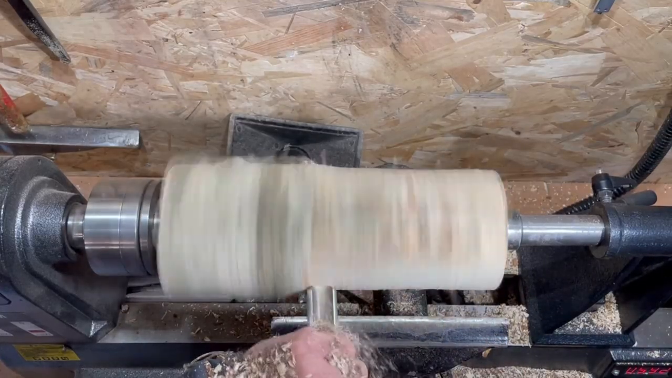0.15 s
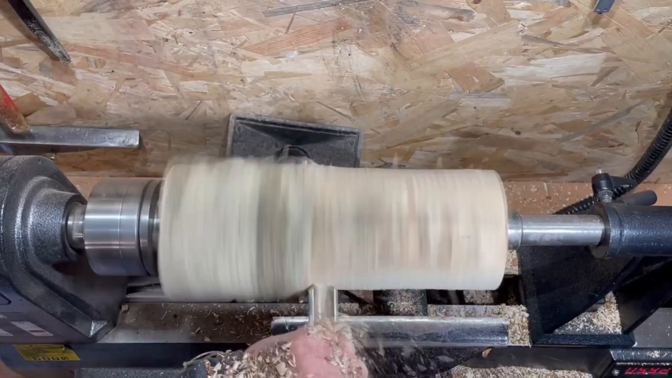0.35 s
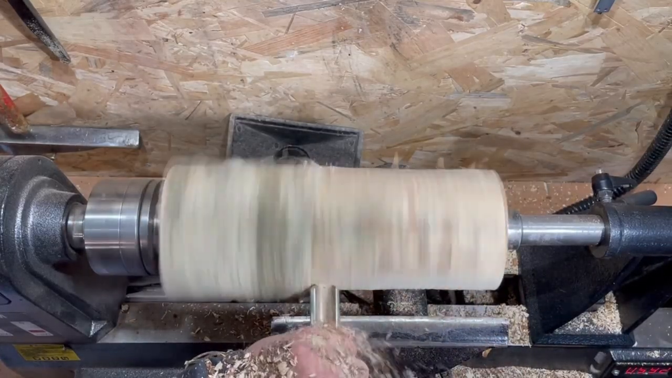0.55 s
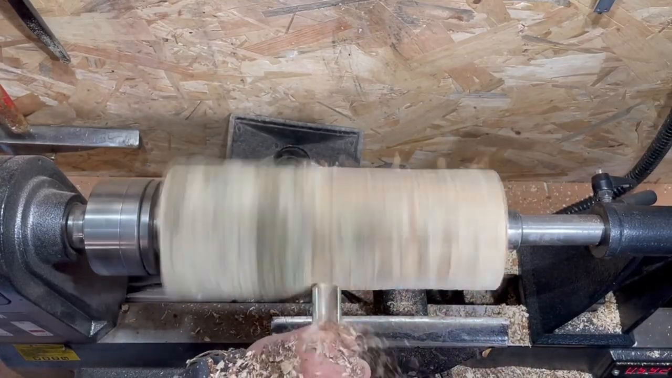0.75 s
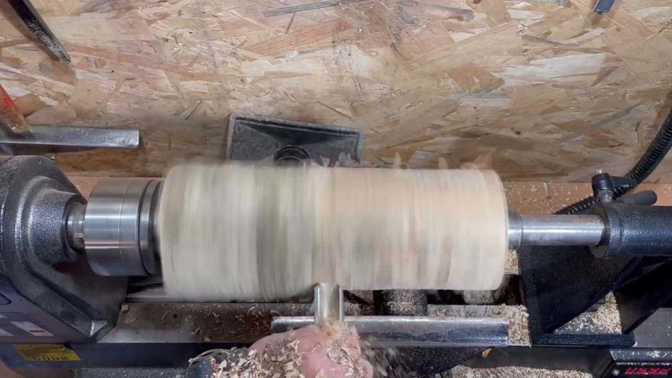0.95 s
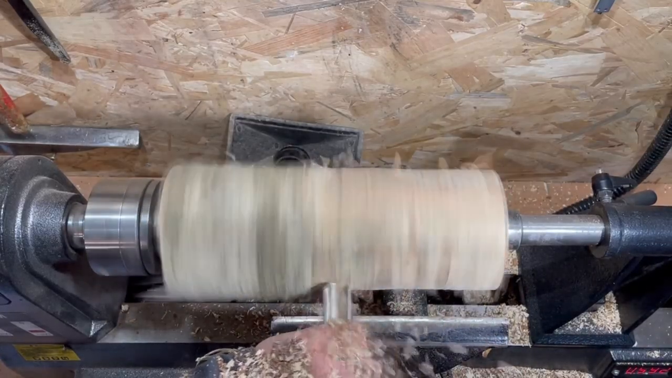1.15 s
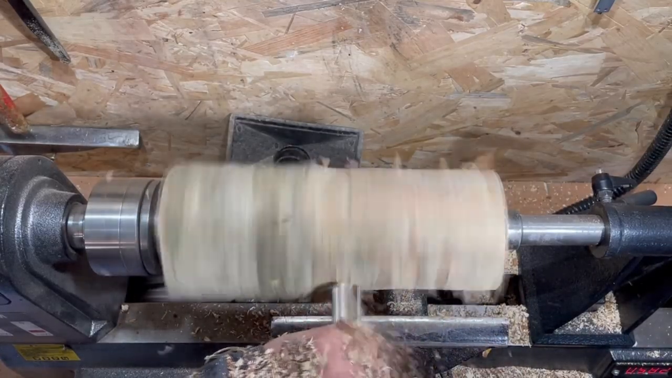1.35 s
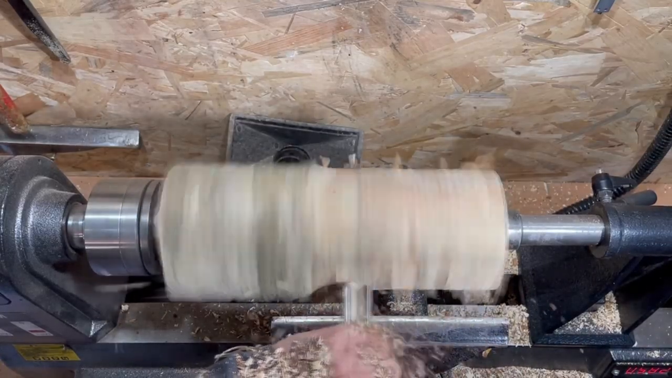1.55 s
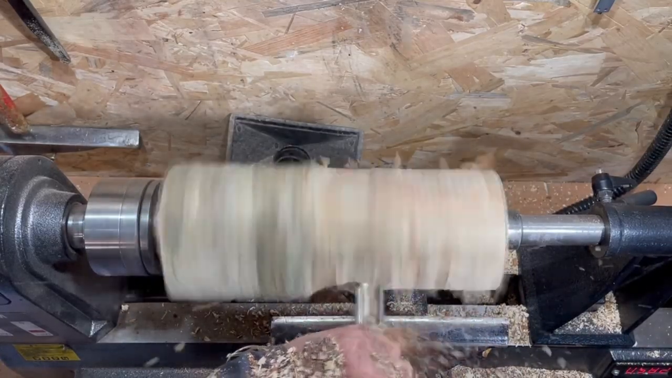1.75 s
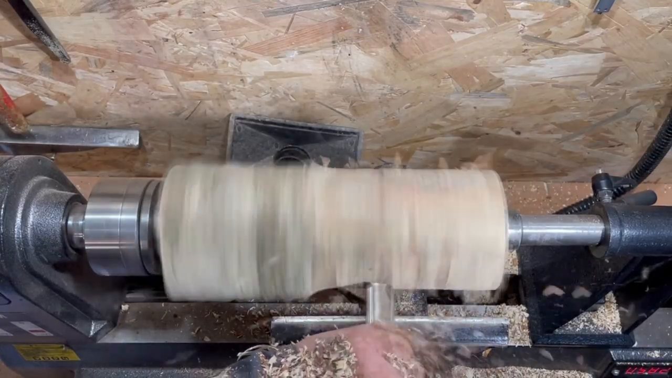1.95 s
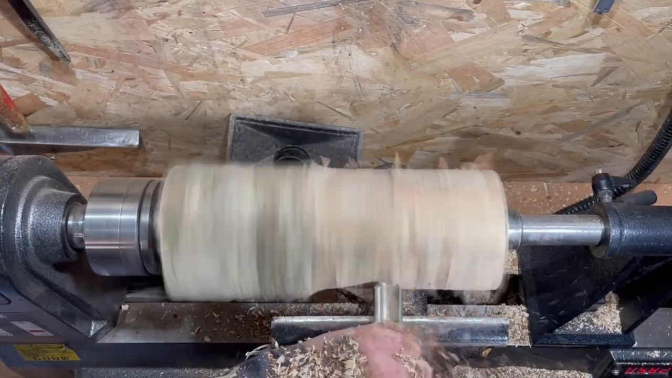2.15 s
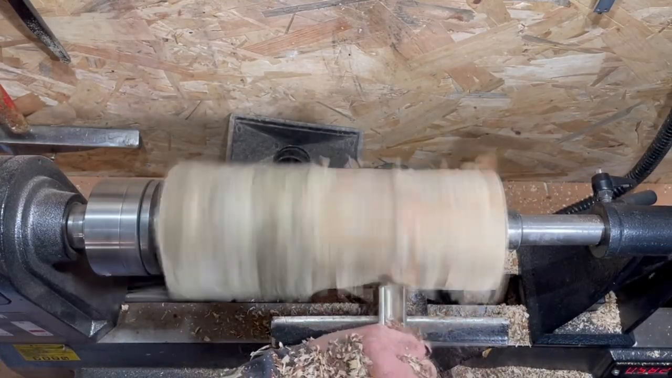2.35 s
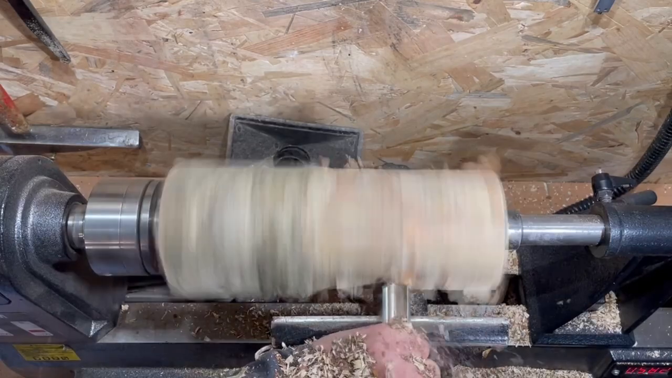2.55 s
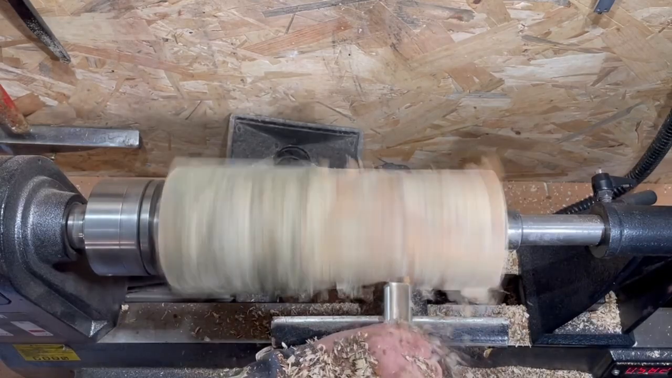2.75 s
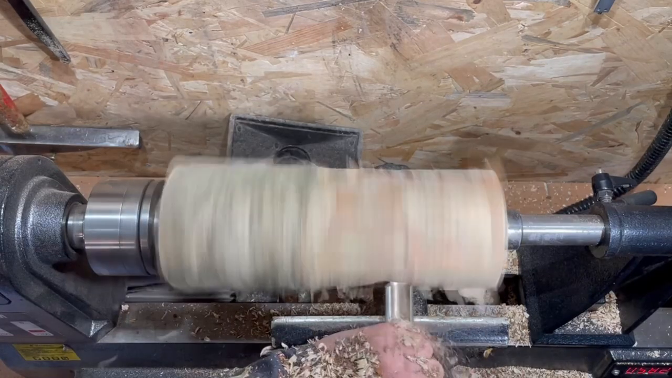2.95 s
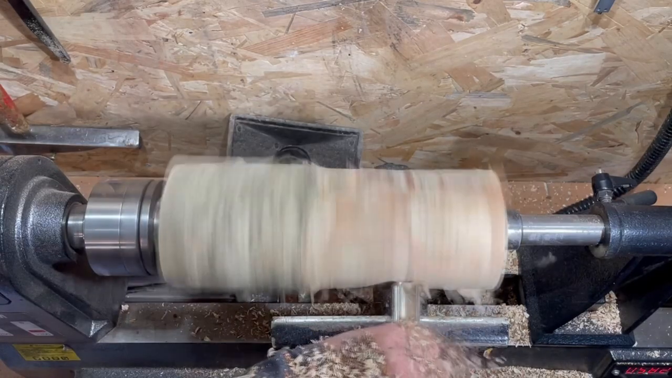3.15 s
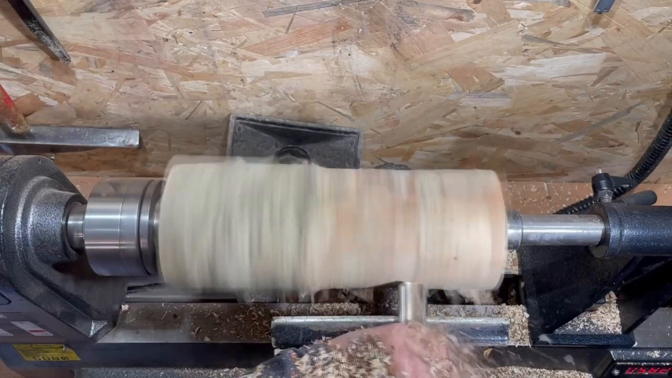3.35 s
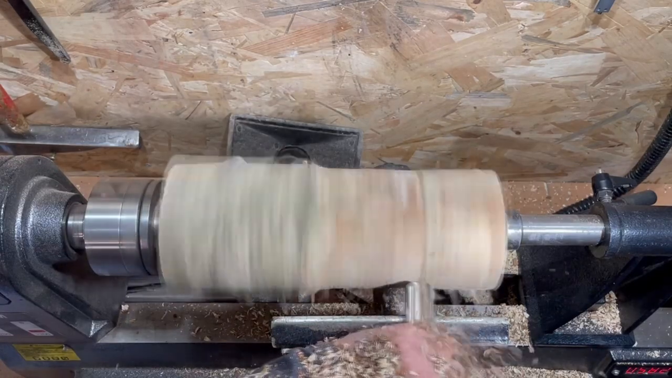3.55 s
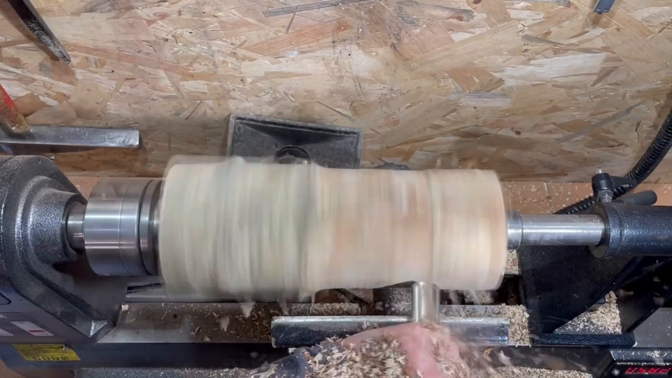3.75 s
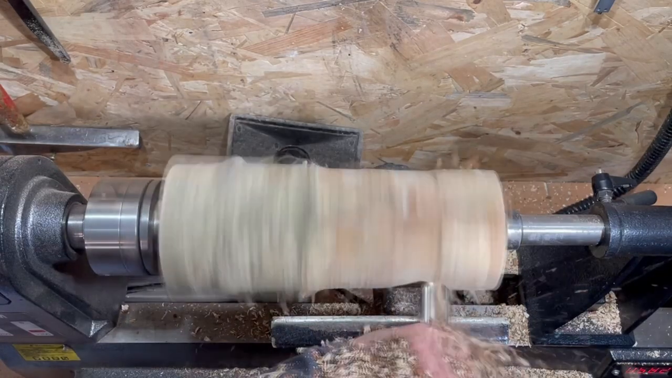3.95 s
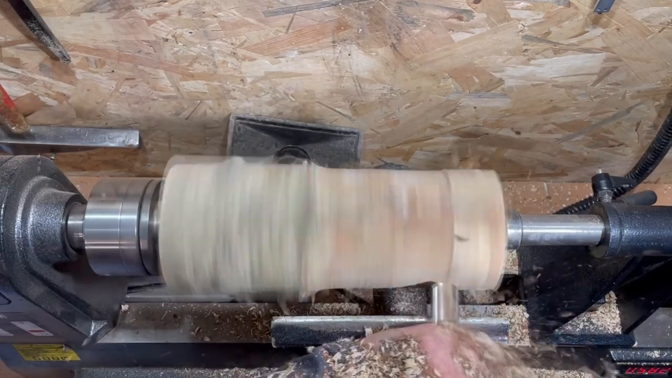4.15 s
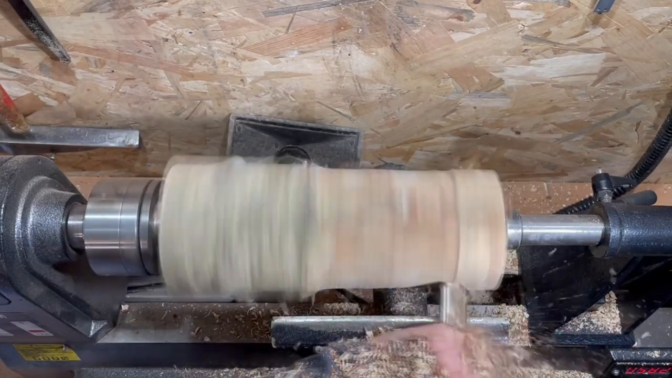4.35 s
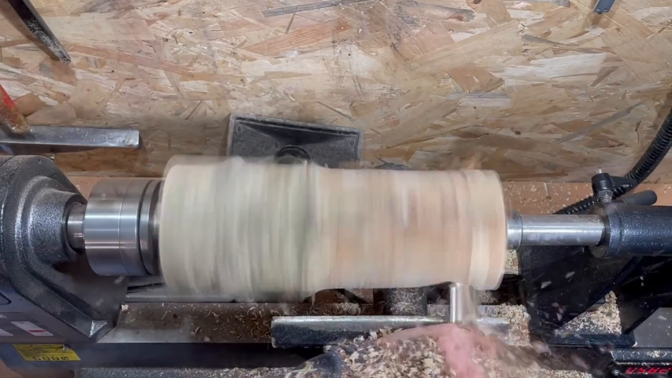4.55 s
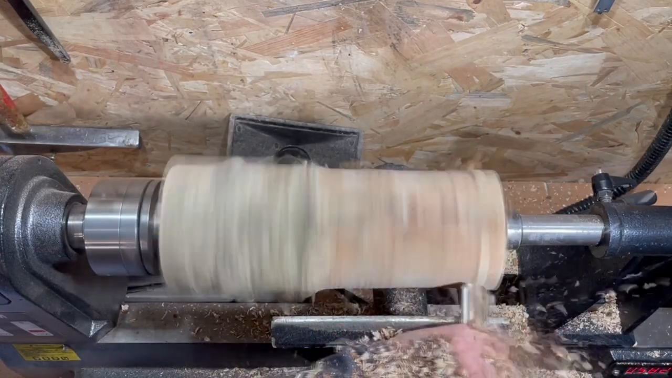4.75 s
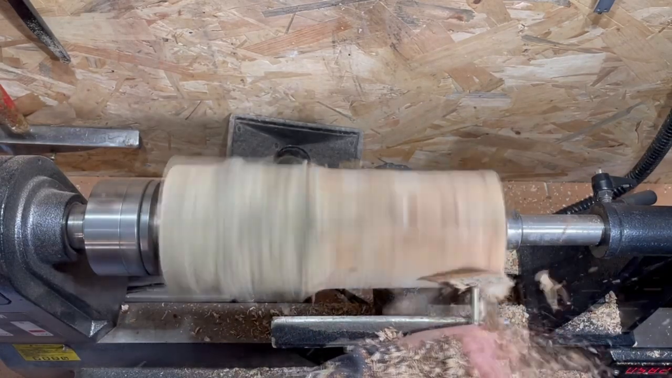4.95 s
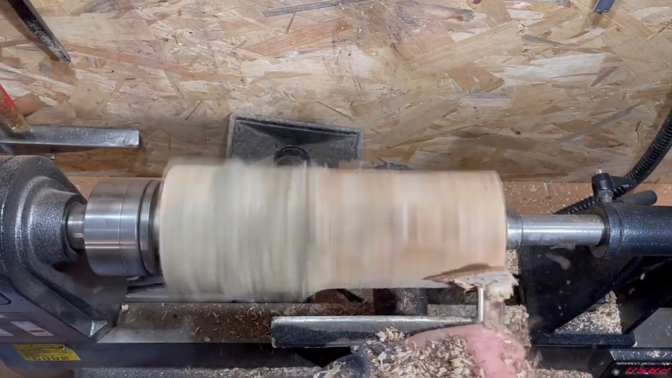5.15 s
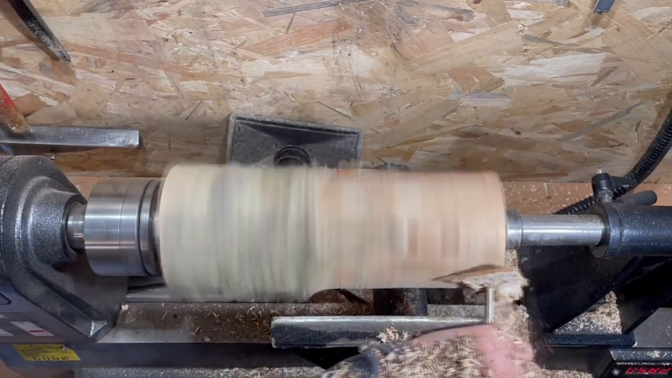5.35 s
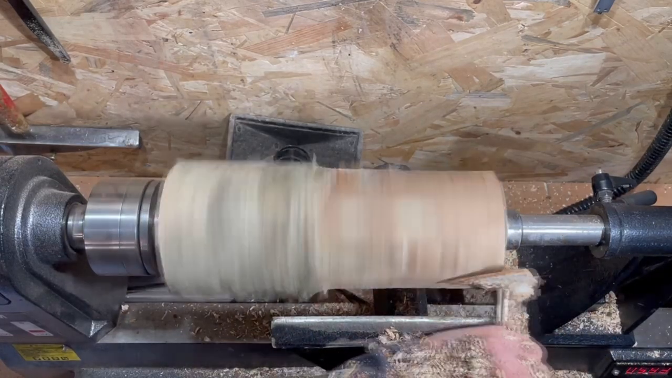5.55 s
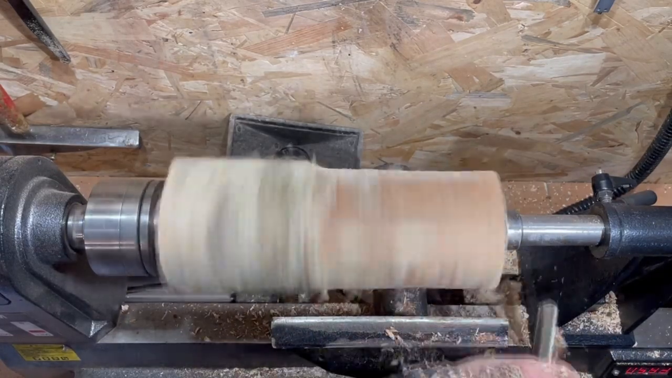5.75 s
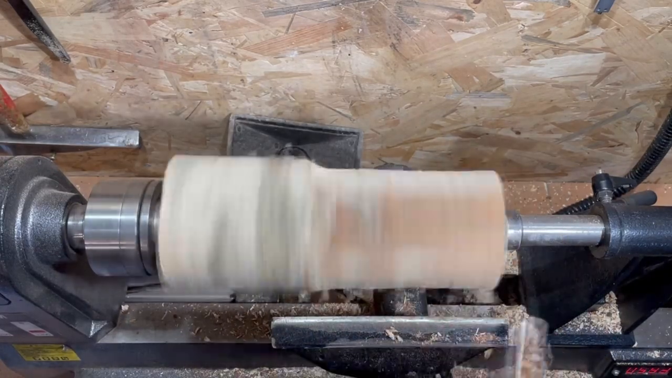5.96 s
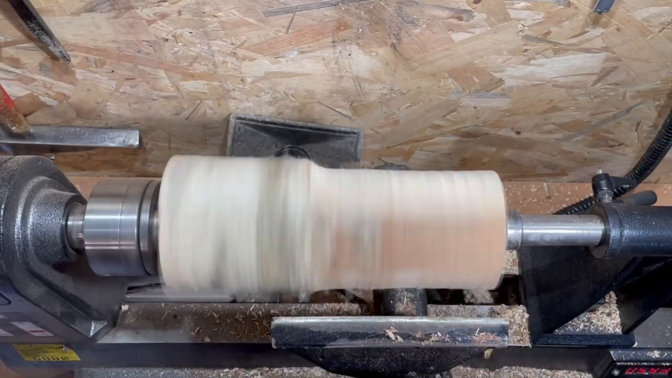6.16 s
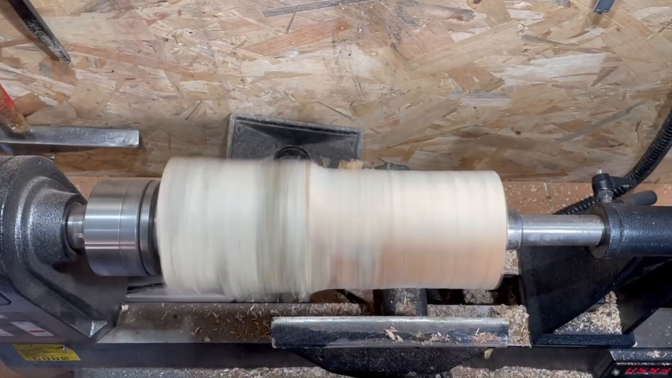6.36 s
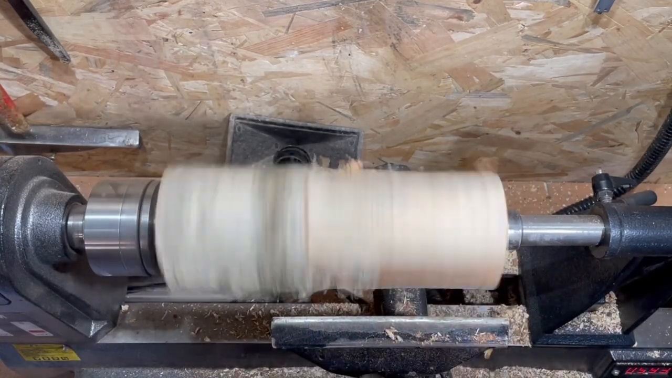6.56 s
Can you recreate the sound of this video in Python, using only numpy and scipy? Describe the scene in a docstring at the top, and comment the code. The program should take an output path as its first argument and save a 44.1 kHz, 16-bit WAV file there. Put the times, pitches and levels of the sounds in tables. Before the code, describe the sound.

Close to a wood lathe in a small workshop, a steel gouge tears into an uneven spinning log with a loud, rough, rapidly pulsing scrape. Shavings hiss, ridges knock against the edge, splinters squeak and the tool rest buzzes at one low pitch. The cut skips briefly, bites harder, then fades as the gouge lifts off. A few chips tick down over the quiet motor hum, fan and thin high whine.

```python
"""A workshop, close to the lathe: a steel gouge roughs an uneven log spinning about ten times a second.
Flats and ridges break the tearing of the fibres in the same rhythm every turn; log, tool, rest and bed
ring with it. Shavings hiss, ridges knock, splinters squeak and the rest chatters at one pitch.
When the gouge leaves the wood, the motor's fan and hum, the whine of its drive and a few falling
chips remain."""
import sys
import numpy as np
from scipy import signal
from scipy.fft import rfft, irfft, next_fast_len
from scipy.io import wavfile
from scipy.ndimage import uniform_filter1d

SR = 44100
rng = np.random.default_rng(int(sys.argv[2]) if len(sys.argv) > 2 else 0)


def to_wav(sig):
    """Store sig (one row per channel, or 1-D mono) as 16-bit WAV at the path in sys.argv[1].

    Samples outside -1..1 are clipped; the rate is SR.
    """
    pcm = np.clip(np.atleast_2d(sig), -1, 1) * 32767
    pcm = np.round(pcm).astype(np.int16)
    wavfile.write(sys.argv[1], SR, pcm.T)  # frames by channels


N = 291501
SIZE = next_fast_len(N + SR)
HZ, TIME = np.fft.rfftfreq(SIZE, 1 / SR), np.arange(N) / SR
TURN_MS, CHATTER_HZ = 99.2, 270.5
CARRIER_HZ, FIELD_HZ = 9910.7, 29.65  # the motor's drive
HISS_SHARE, BLADE_SHARE = 0.4, 0.79  # how far hiss and blade follow a skip or a grab

# Faders of the cut, trimmed per layer: t/s, tearing/dB, blade over tearing/dB, rest boom/dB, chatter/dB
CUT_FADERS = [(0.05, -35.5, 4.5, -33.5, -39), (0.5, -35.5, 7.5, -35.5, -34.5),
              (0.9, -38.5, 6.5, -35.5, -37.5), (1.1, -29, 2, -33, -40), (1.5, -27, 0, -33, -35.5),
              (1.75, -25.5, -1.5, -26.5, -31), (2.1, -29, -1, -33.5, -28.5), (2.3, -32.5, -1.5, -36, -47),
              (2.42, -31.5, -3, -37.5, -31.5), (2.65, -32, 0, -35.5, -35), (2.9, -36, 0.5, -43.5, -37.5),
              (3.12, -27.5, -4, -34.5, -37.5), (3.7, -31.5, 1, -37, -28.5), (3.95, -25, -2, -30, -25.5),
              (4.17, -29, -2, -32, -30), (4.37, -24.5, -2.5, -29, -28), (4.55, -28.5, -1, -33.5, -27.5),
              (4.8, -25, -4, -29.5, -32), (5.05, -32.5, 2.5, -32, -36), (5.35, -34, 0, -38, -33.5),
              (5.5, -43.5, 0, -49, -55), (5.62, -51, -4, -61, -71), (5.67, -61, -7, -64, -65)]
# The machine answers as the gouge travels along the rest: t/s, shank ring/dB, bed shake/dB
MACHINE_FADERS = [(0.05, -32.5, -47.5), (0.55, -36, -44), (0.9, -38.5, -52), (1.15, -27.5, -60),
                  (1.55, -35.5, -60), (1.8, -40, -48.5), (2.1, -48, -48), (2.3, -61, -53.5),
                  (3.2, -54, -54.5), (3.7, -47, -53), (4.0, -32, -54), (4.4, -37, -53), (4.7, -34, -60),
                  (4.88, -32, -44), (5.1, -44, -63), (5.35, -41, -54.5), (5.6, -72, -68)]
# The hiss of the shavings swells and thins with the grain: t/s, gain/dB
HISS_FADER = [(0.05, 5), (0.6, 6), (1.1, 1.5), (1.9, 1), (2.3, 2), (2.6, 1), (3.6, 2), (4.2, 3), (4.6, 4),
              (5.2, 5), (5.6, 5)]
# The rest is loaded and eased once a turn: t/s, swing/dB
REST_ROCKING = [(0.1, 6), (2.0, 0.5), (3.6, 4), (5.3, 1)]
# The spindle drags under a heavy cut, then catches up: t/s, main ridge's delay into the turn/ms
SPINDLE_LAG = [(0.05, 56), (0.5, 52), (1.05, 49.5), (1.35, 50), (1.64, 52.5), (2.24, 56.4), (2.63, 52.7),
               (3.22, 49.2), (3.55, 48.4), (3.92, 49.2), (4.42, 53.6), (4.9, 57), (5.6, 59)]
# Three flats on the log: end after the main ridge/ms, base length/ms, lip bite over depth/ratio
LOG_FLATS = [(99.4, 10.2, 0.55), (38.5, 13, 0.5), (62.5, 13.5, 0.15)]
# Depth of the flats along the log: t/s, first/dB, second/dB, third/dB, first comes early by/ms
FLAT_DEPTHS = [(0.1, 11, 13, 15, 0.5), (0.5, 6.5, 9, 8, -0.5), (0.9, 6, 5, 2, 0), (2.0, 6.5, 3, -2, 1),
               (2.5, 6.5, 5, 0, 0), (3.3, 7, 5, 1, 0), (4.1, 8, 0, 0.5, 0), (4.7, 5.5, 4, 0, 1),
               (5.3, 6.5, 5, -0.5, 5.5), (5.6, 6, 0.5, 3, 15.5)]
# Narrow ridges of hard grain: t/s, first at/ms, first/dB, second at/ms, second/dB, third/dB
GRAIN_RIDGES = [(0.1, 22, 5.5, 49, -1, 8), (0.8, 23.5, 6.5, 37.5, 7, 0), (1.3, 21, 0, 49.6, 6, 6.5),
                (2.0, 25, 4, 59, 2, 5), (3.0, 31.6, 2.5, 51, 5.5, 2), (4.2, 31.5, 4, 50, 2, 3),
                (4.7, 25, -1, 56, 0, 2), (5.2, 36, -1, 52, 3.5, 1)]

# The edge strikes a ridge: t/s, level/dB, crack over knock/dB
RIDGE_HITS = [(0.2526, -23, 4), (0.4324, -22, -17), (0.9836, -25, -4), (1.5389, -16, -10),
              (1.6402, -9.5, -3.5), (2.14, -15.5, -16), (2.176, -20, 1.5), (2.2392, -17.5, -26),
              (2.6326, -12, -25), (2.7315, -13, -26), (2.8295, -14.5, -21), (2.9277, -14, -30),
              (3.0253, -15.5, -29), (3.1254, -14.5, -17), (3.2247, -15, -23), (3.323, -13, -11),
              (3.4216, -13.5, -16), (3.5204, -12, -16), (3.7202, -15.5, -4), (3.8182, -16, -20),
              (3.918, -12, -5), (4.018, -17.5, 0.5), (4.1195, -14, -21), (4.2178, -13.5, -22),
              (4.3184, -11.5, -14), (4.4183, -9.5, -11), (4.7028, -14, -8), (4.8035, -13.5, -7),
              (4.905, -11, -4), (4.918, -16, -10)]
# The edge skips clear of the wood: t/s, length/s, depth/dB
EDGE_SKIPS = [(2.175, 0.073, 12), (2.246, 0.083, 13), (2.45, 0.072, 5), (2.545, 0.08, 12.5)]
# The edge grabs a thick shaving: t/s, boost/dB, decay/s, extra hiss/dB
EDGE_GRABS = [(0.981, 0, 0.017, 14), (1.74, 6, 0.021, 0), (1.795, 11, 0.007, -7), (2.377, 16, 0.019, 5),
              (2.54, -5, 0.051, 13.5), (2.672, 7, 0.03, 4), (4.66, 8, 0.029, -1), (1.638, 8, 0.011, 2),
              (2.633, 2.5, 0.025, -3), (5.42, 9, 0.0074, 2)]
# Big splinters break off: t/s, f/Hz, level/dB
SPLINTER_BREAKS = [(2.383, 1900, -15), (2.647, 2900, -19), (2.683, 2050, -19), (5.0275, 3480, -24),
                   (5.066, 3470, -26), (5.172, 2010, -27), (5.2674, 3460, -28), (5.272, 5150, -33),
                   (5.3702, 2790, -31), (5.4246, 2770, -30), (5.5169, 2720, -39)]
# Loose chips tick on the bed: t/s, level/dB
CHIP_TICKS = [(5.549, -35), (5.5822, -37), (5.6012, -26), (5.6296, -31.5), (5.8032, -38), (6.0492, -40),
              (6.3894, -43)]

# Resonances of log, blade, cutting tip, shank, tool rest and log end: f/Hz, width/Hz, level/dB
WOOD_MODES = [(1657, 10.7, 2.5), (1979, 160, 2.5), (2276, 52, -1.5)]
BLADE_MODES = [(3420, 55, 8), (3975, 60, -5), (2740, 70, -3), (3200, 100, 0.5), (2540, 40, -2)]
TIP_MODES = [(5146, 380, 0)]
SHANK_MODES = [(1325, 120, 0)]
REST_MODES = [(243.4, 16, 0), (295.7, 20, -1), (357, 12, 3), (437, 14, 2), (500, 30, 0), (542, 16, 1)]
LOG_END_MODES = [(770, 250, 0), (956, 240, 0)]
# Broad colour of log, blade, rest, shavings, and motor fan with bearings: f/Hz, gain/dB
WOOD_EQ = [(500, -55), (700, -10), (1100, -5), (1800, -10), (2500, -14.5), (3200, -31)]
BLADE_EQ = [(1900, -56), (2500, -2), (3400, 4.5), (3750, -6), (4400, -4.5), (5300, -7.5), (5600, -34),
            (6500, -18)]
REST_EQ = [(90, -29), (150, -20), (200, -8), (400, -3), (580, -17), (800, -26)]
HISS_EQ = [(4000, -72), (5800, -3), (7000, 0.5), (9000, -3), (11000, 3), (14000, 0), (16000, -3)]
FAN_EQ = [(25, -10), (90, -9), (600, -5), (840, -8), (950, -18.5), (1500, -12.5), (6000, -32), (8800, -35),
          (10000, -12), (11000, -22), (11800, -33), (14000, -33)]
# Hum of the motor housing: f/Hz, width/Hz, level/dB
HOUSING_HUM = [(88, 20, -64), (237, 20, -62), (270, 12, -58), (357, 10, -59), (497, 8, -54), (542, 12, -56),
               (630, 8, -55.5), (830, 50, -65), (2700, 120, -73), (3800, 90, -74)]
# Side tones of the drive: offset from the carrier/steps of FIELD_HZ, level/dB
DRIVE_TONES = [(-14, -61), (-8, -58), (-6, -60), (-3, -61), (-2, -53), (2, -51), (3, -62), (4, -57),
               (6, -62)]

# Likeness of left and right: f/Hz, coherence/ratio
STEREO_LIKENESS = [(60, .98), (280, .98), (560, .5), (1400, .8), (4000, .72), (6000, .6), (8500, .86),
                   (13000, .97)]
# Phase between the sides: f/Hz, left lead/rad
STEREO_PHASE = [(60, 0), (2100, .15), (3300, .9), (5500, .1), (5900, -.8), (6900, -1.1), (7700, -3),
                (9500, -3.3), (11000, -4.6), (12400, -6.1), (13100, -6.28)]
# Balance: f/Hz, left over right/dB
STEREO_BALANCE = [(60, .5), (300, 2.8), (700, 1.6), (4500, 1.7), (8000, 0)]
LIFT_S = CUT_FADERS[-1][0]  # the gouge leaves the wood


def gouge():
    """Tearing fibres drive the log, the blade, the air, the tool rest, the shank and the bed."""
    cut_db, blade_db, rest_db, _ = curves(CUT_FADERS)
    shank_db, bed_db = curves(MACHINE_FADERS)
    skip_db, (grab_db, spray_db) = skips_db(), grabs_db()
    tear_db = cut_db + skip_db + grab_db
    ring_db = cut_db + BLADE_SHARE * (skip_db + grab_db) + blade_db
    hiss_db = -34.5 + 0.48 * (cut_db + 26)  # the hiss rises less than the tearing
    hiss_db += 1.4 * np.minimum(cut_db + 45.5, 0)  # and dies as the edge leaves the log
    hiss_db += HISS_SHARE * skip_db + spray_db + curves(HISS_FADER)[0]
    hollow_db = tear_db + 4 * (TIME - 4)  # hollower as the gouge nears the log's end
    rock_db = curves(REST_ROCKING)[0] * np.cos(2 * np.pi * (since_ridge_ms() - 19.3) / TURN_MS)
    fade_out = amp(-300 * np.maximum(TIME - LIFT_S, 0))
    contact, chips = contact_db(), chip_bursts(per_s=90, decay_ms=10.7)
    # level/dB, contact amount, chip amount, filter, snap rate/Hz, snap share
    layers = [(tear_db - 3, 1.2, 1.1, eq(WOOD_EQ) + modes(WOOD_MODES), 2500, .14),
              (ring_db - 0.9, 1.2, 1.1, eq(BLADE_EQ) + modes(BLADE_MODES), 4000, .14),
              (tear_db - 8.5, .9, 1.4, modes(TIP_MODES), 4000, .22),
              (hollow_db - 13.5, .7, 1.6, modes(LOG_END_MODES), 900, .3),
              (hiss_db + 3, 1.15, 1.5, eq(HISS_EQ), 4000, .25),
              (rest_db + rock_db, .4, .45, eq(REST_EQ) + modes(REST_MODES), 900, 0),
              (shank_db - 4.5, .9, 1.1, modes(SHANK_MODES) ** 2, 900, .25)]
    chirp_level = amp(tear_db + 0.27 * blade_db - 4.5 + contact) * fade_out
    out = splinter_chirps(chirp_level, per_s=600, cycles=10.1, pitches=12)
    out += amp(bed_db) * fade_out * wavering_tone(80.5, drift_hz=2.45, sway_db=3.5)
    for level_db, by_contact, by_chips, response, per_s, share in layers:
        crumble = chips + 1.67 * chip_bursts(per_s=150, decay_ms=12)
        rhythm = unit_rms(amp(by_contact * contact + by_chips * crumble + 1.51 * wander(35)))
        source = fibres(per_s, share)
        gain = source.std() * np.sqrt(np.mean(abs(response) ** 2))
        out += filtered(source * rhythm * amp(level_db) * fade_out, response / gain)
    return out


def fibres(per_s, share):
    """Two unrelated streams of snapping fibres of uneven size over a smooth rub."""
    size = amp(-0.5 * np.minimum(rng.exponential(1, (2, N)), 3)) * rng.choice([-1., 1.], (2, N))
    snaps = size * (rng.random((2, N)) < per_s / SR)
    return share * unit_rms(snaps) + (1 - share) * rng.standard_normal((2, N))


def contact_db():
    """The cut ducks as each flat passes, bites hard at the lip behind it and flares on each ridge."""
    out, turn_ms = np.zeros(N), since_ridge_ms()
    lip_ms, ridge_ms, edge_ms = 1.6, 2.2, 0.47
    *depths_db, early_ms = curves(FLAT_DEPTHS)
    for (end_ms, base_ms, lip), depth_db, shift_ms in zip(LOG_FLATS, depths_db, [early_ms, 0, 0]):
        length_ms = base_ms + 1.24 * (depth_db - 5.5)  # a deeper flat is also longer
        since = (turn_ms - end_ms + shift_ms + length_ms) % TURN_MS
        free = np.clip(since / (0.47 * length_ms), 0, 1) * (since < length_ms)
        bite = lip * np.exp(-np.maximum(since - length_ms, 0) / lip_ms) * (since >= length_ms)
        out += depth_db * (bite - free)
    first_ms, first_db, second_ms, second_db, third_db = curves(GRAIN_RIDGES)
    for at_ms, rise_db in [(first_ms, first_db), (second_ms, second_db), (92, third_db)]:
        out += rise_db * np.exp(-((turn_ms - at_ms) / ridge_ms) ** 2)
    return uniform_filter1d(out, int(edge_ms * SR / 1000) + 1)


def since_ridge_ms():
    """Time since the main ridge last passed the gouge."""
    return (1000 * TIME - curves(SPINDLE_LAG)[0]) % TURN_MS


def skips_db(ramp_s=0.014):
    """The cut drops out while the edge is clear of the wood."""
    return sum(-db * np.clip(np.minimum(TIME - s, s + length - TIME) / ramp_s, 0, 1)
               for s, length, db in EDGE_SKIPS)


def grabs_db(attack_s=0.0055):
    """Accents on the tearing (row 0) and the hiss (row 1) when the edge grabs."""
    out = np.zeros((2, N))
    for s, db, decay_s, hiss_db in EDGE_GRABS:
        since = np.maximum(TIME - s, 0)
        envelope = np.minimum(since / attack_s, 1) * np.exp(-since / decay_s)
        out += np.outer([db, HISS_SHARE * db + hiss_db], envelope)
    return out


def chip_bursts(per_s, decay_ms):
    """Level flutter of chips breaking off: quick attacks and short tails, with no long swells."""
    starts = rng.random(N) * (rng.random(N) < per_s / SR)
    tails = signal.lfilter([1], [1, -np.exp(-1000 / (decay_ms * SR))], starts)
    bursts = uniform_filter1d(tails, int(0.0019 * SR))
    return np.minimum(unit_rms(bursts - uniform_filter1d(bursts, int(.07 * SR))), 2)


def splinter_chirps(level, per_s, cycles, pitches):
    """Coarse splinters tear off, each ringing briefly at a sliding pitch."""
    out, t = np.zeros((2, N)), np.arange(900) / SR
    for hz in np.geomspace(1250, 4300, pitches) * rng.uniform(.96, 1.04, pitches):
        glide = 1 + rng.uniform(-10.5, 7.94) * t
        ring = np.sin(2 * np.pi * hz * t * glide) * t * np.exp(-hz * t / cycles)
        snaps = rng.standard_normal((2, N)) * (rng.random((2, N)) < per_s / pitches / SR)
        out += signal.oaconvolve(snaps * level, ring[None] / np.linalg.norm(ring), axes=1)[:, :N]
    return out * np.sqrt(SR / per_s)


def ridge_blows(knock_hz=1510, knock_ms=0.41, bounce_s=0.0035):
    """The edge hits a ridge and bounces once: a dry knock and a crack, then log and blade ring on."""
    times, level_db, crack_db = np.transpose(RIDGE_HITS)
    t = np.arange(-30, 60) / SR
    knock = -np.cos(2 * np.pi * knock_hz * t) * np.exp(-(1000 * t / knock_ms) ** 2)
    knocks = triggered(knock, times, level_db)
    knocks += amp(-7) * np.roll(knocks, int(bounce_s * SR))
    ring = filtered(knocks, modes(WOOD_MODES) + amp(-16) * modes(BLADE_MODES))
    cracks = filtered(noise_ticks(times, level_db + crack_db), eq(HISS_EQ, -3) + eq(BLADE_EQ, 8))
    return amp(-0.5) * (knocks + ring) + cracks


def big_splinters(attack_ms=3):
    """Each swells and dies as it breaks off, squeaking around its own pitch."""
    out, t, jitter = np.zeros(N), np.arange(2000) / SR, wander(1.1)
    rise = 1000 * t / attack_ms
    for s, hz, db in SPLINTER_BREAKS:
        span = slice(round(s * SR), round(s * SR) + len(t))
        cycles = np.cumsum(hz * (1 + .03 * jitter[span])) / SR + rng.random()
        out[span] += amp(db) * rise * np.exp(1 - rise) * np.sin(2 * np.pi * cycles)
    return out


def rest_chatter(catch_s=4.908, catch_length_s=0.045):
    """The tool rest buzzes at one wavering pitch; the gouge digs in once, swelling and shoving it."""
    level = amp(curves(CUT_FADERS)[-1] + 0.5 + 3.95 * wander(20.7)) * (TIME < LIFT_S)
    progress = np.clip((TIME - catch_s) / catch_length_s, 0, 1)
    swell = amp(-16) * np.sin(np.pi * progress ** 2)  # builds slowly, stops fast
    tone = np.sin(2 * np.pi * np.cumsum(CHATTER_HZ + 3.94 * wander(19)) / SR)
    shove = filtered(swell * wander(0.5), modes([(304, 480, 0)]) ** 2)
    return (level + swell) * tone + 0.5 * shove


def falling_chips():
    """Loose chips land on the bed with small woody ticks."""
    colour = eq(HISS_EQ, -19) + eq(BLADE_EQ, -1) + eq(WOOD_EQ, 11.5)
    return filtered(noise_ticks(*np.transpose(CHIP_TICKS)), colour)


def motor():
    """Fan air, the housing's hum (wide bands as noise, narrow ones as tones) and the drive's whine."""
    fan = unit_rms(filtered(rng.standard_normal((2, N)), eq(FAN_EQ))) * amp(-50.5 + .7 * wander(30))
    bands = sum(amp(db) * unit_rms(abs(modes([(hz, width, 0)])) ** 2)
                for hz, width, db in HOUSING_HUM if width > 15)
    hum = filtered(rng.standard_normal((2, N)), bands)
    hum += sum(amp(db) * wavering_tone(hz, drift_hz=width / 2, sway_db=3.5)
               for hz, width, db in HOUSING_HUM if width <= 15)
    whine = np.zeros(N)
    for step, db in DRIVE_TONES:
        hz = CARRIER_HZ + step * FIELD_HZ
        whine += amp(db + 2 * wander(40)) * np.sin(2 * np.pi * (hz * TIME + rng.random()))
    return fan + hum + whine * [[1], [.3]]


def workshop_echoes(x, reverb_s=0.14):
    """A tight room: sparse reflections, duller than the direct sound."""
    t = np.arange(SR // 2) / SR
    taps = rng.choice([-1., 1.], (2, len(t))) * (rng.random((2, len(t))) < .05)
    taps *= amp(-60 * t / reverb_s) * (t > .004)
    dull = signal.lfilter([.4], [1, -.6], taps)
    return signal.fftconvolve(x, dull / np.linalg.norm(dull[0]), axes=1)[:, :N]


def stereo_image(x):
    """Row 0 feeds both sides, shifted in phase on the right; row 1 adds width on the right only."""
    common, side = rfft(x, SIZE)
    alike, pan = np.clip(over_hz(STEREO_LIKENESS), 0, 1), amp(over_hz(STEREO_BALANCE) / 2)
    right = alike * common * np.exp(-1j * over_hz(STEREO_PHASE)) + np.sqrt(1 - alike ** 2) * side
    return irfft([common * pan, right / pan], SIZE)[:, :N]


def wavering_tone(hz, drift_hz, sway_db):
    """A tone whose pitch and level drift a little; its two rows are a quarter cycle apart."""
    phase = 2 * np.pi * (np.cumsum(hz + drift_hz * wander(45)) / SR + rng.random())
    return np.sqrt(2) * amp(sway_db * wander(22)) * np.array([np.sin(phase), np.cos(phase)])


def noise_ticks(times, levels_db, decay_s=.003):
    """A sharp puff of noise at each time."""
    envelope = np.exp(-np.arange(600) / (decay_s * SR))
    return triggered(envelope, times, levels_db) * rng.standard_normal(N)


def triggered(shape, times, levels_db):
    """One copy of the shape at each time."""
    train = np.zeros(N)
    train[np.round(times * SR).astype(int)] = amp(levels_db)
    return signal.oaconvolve(train, shape)[:N]


def wander(ms):
    """Random modulation of unit RMS, smoothed over ms."""
    width = int(ms * SR / 1000)
    return unit_rms(uniform_filter1d(uniform_filter1d(rng.standard_normal(N), width), width))


def modes(table):
    """Frequency response of damped resonances that ring when driven."""
    return sum(amp(db) * 1j * HZ * width / (hz ** 2 - HZ ** 2 + 1j * HZ * width)
               for hz, width, db in table)


def curves(table):
    """One automation curve for each column after the time."""
    times, *columns = np.transpose(table)
    return [np.interp(TIME, times, column) for column in columns]


def over_hz(points):
    """Breakpoints joined along a log frequency axis."""
    hz, value = np.transpose(points)
    return np.interp(np.log(HZ + 1), np.log(hz + 1), value)


def eq(points, gain_db=0):
    return amp(over_hz(points) + gain_db)


def filtered(x, response):
    return irfft(rfft(x, SIZE) * response, SIZE)[..., :N]


def amp(db):
    return 10 ** (np.asarray(db) / 20)


def unit_rms(x):
    return x / np.sqrt(np.mean(x ** 2) + 1e-20)


def scene():
    """The cut up front with a touch of room, over the chatter and the motor."""
    cut = gouge() + (ridge_blows() + falling_chips() + big_splinters()) * [[1], [.5]]
    return stereo_image(cut + amp(-15) * workshop_echoes(cut) + rest_chatter() * [[1], [0]] + motor())


def record(dry, cutoff_hz=15750):
    """A steep high cut on the mix."""
    lowpass = signal.firwin(511, cutoff_hz, window=("kaiser", 9), fs=SR)
    return signal.oaconvolve(dry, lowpass[None], "same")


dry = scene()
out = record(dry)
to_wav(out)
```